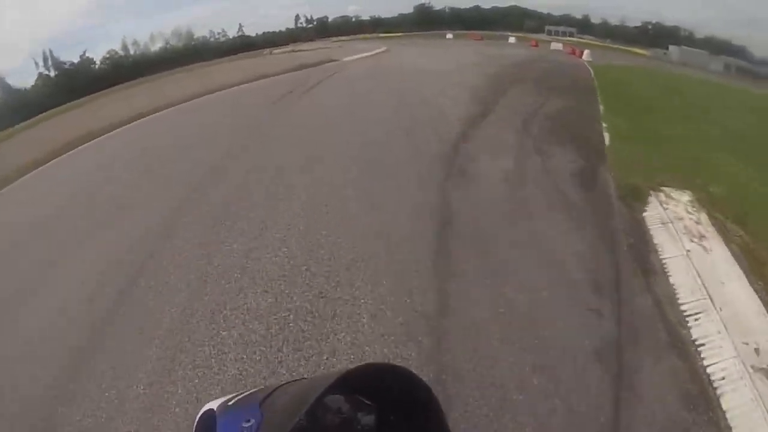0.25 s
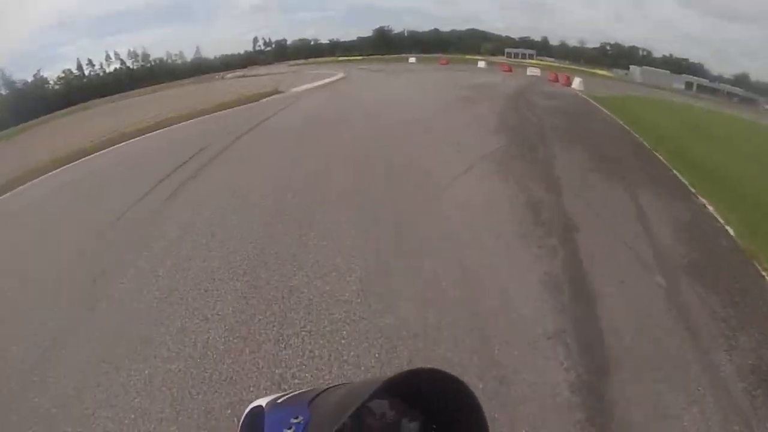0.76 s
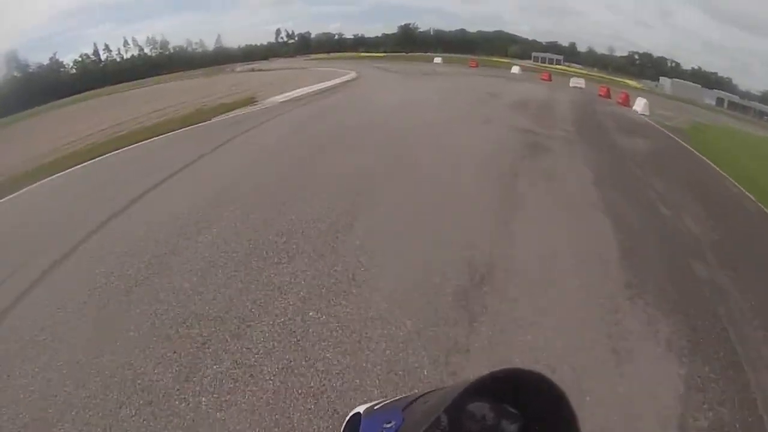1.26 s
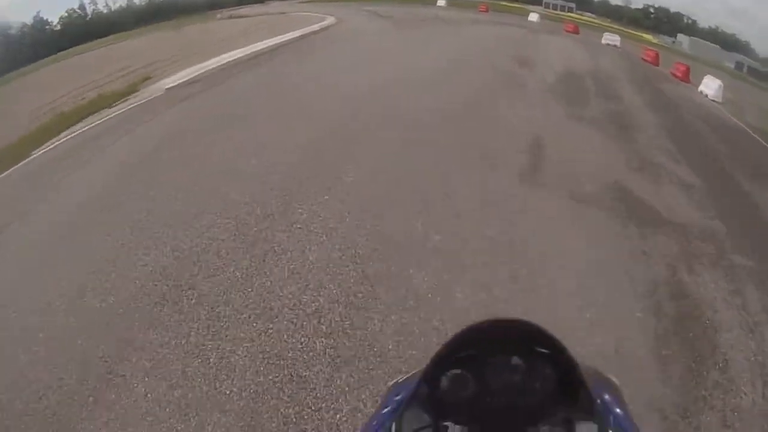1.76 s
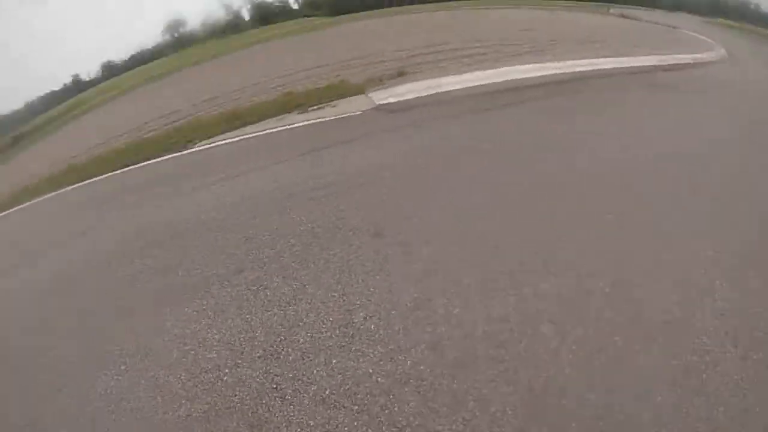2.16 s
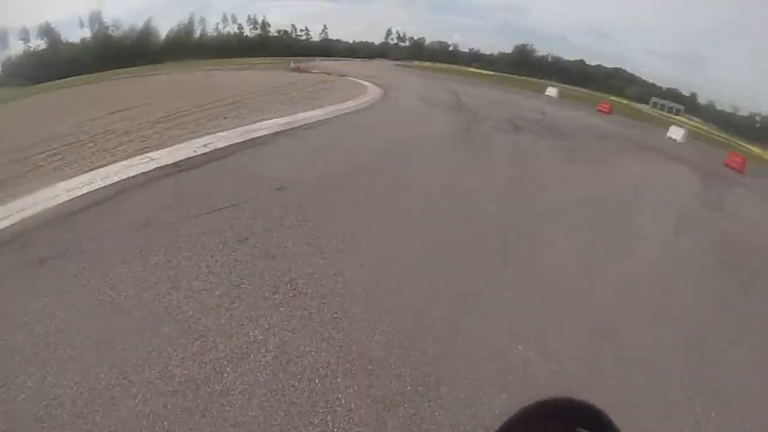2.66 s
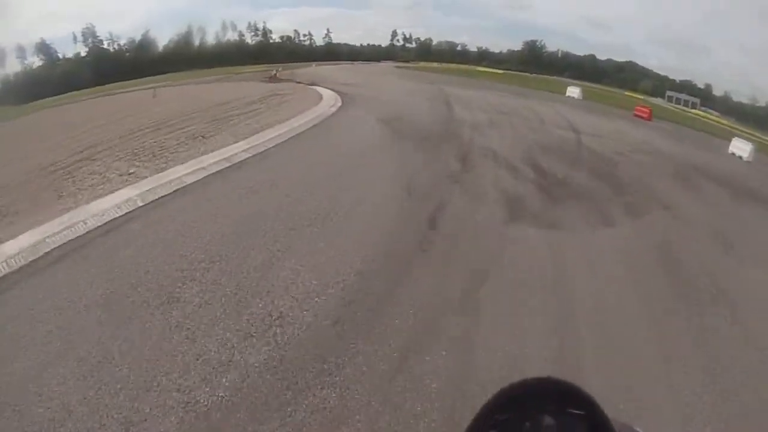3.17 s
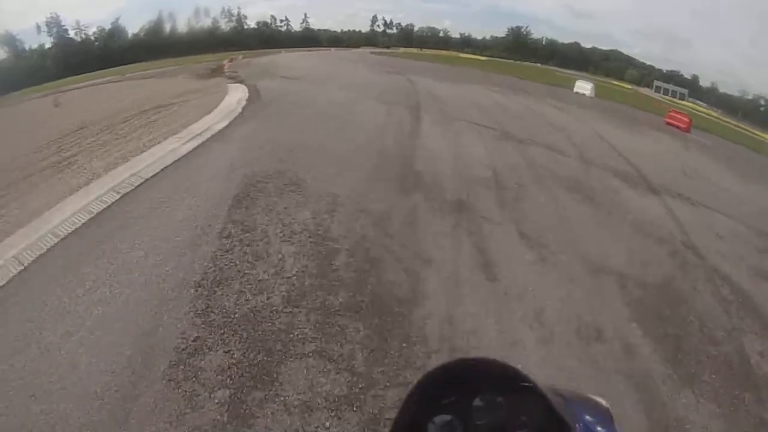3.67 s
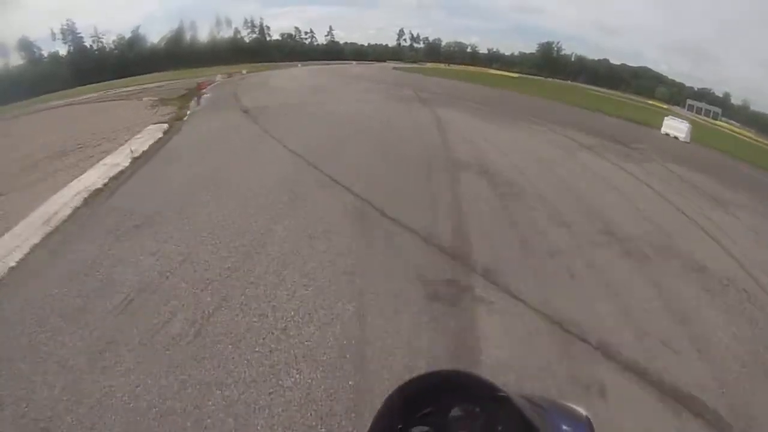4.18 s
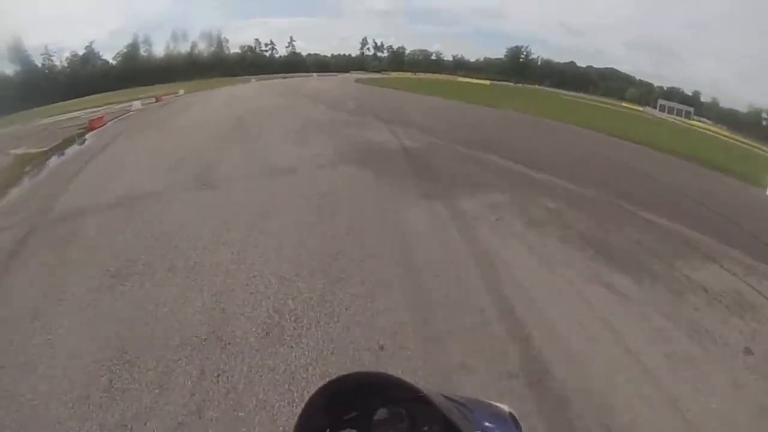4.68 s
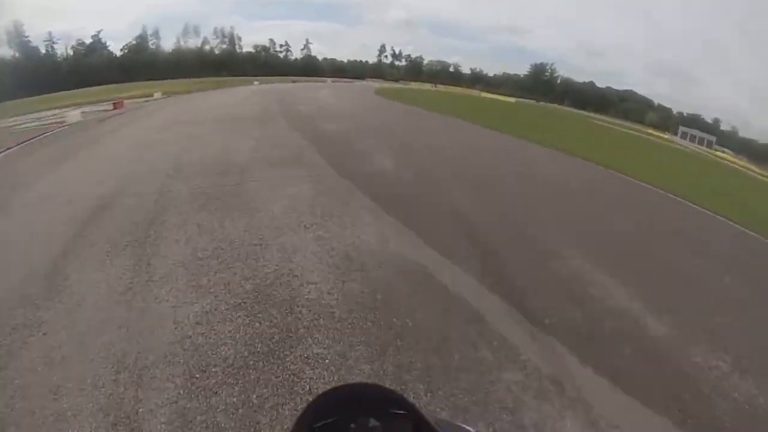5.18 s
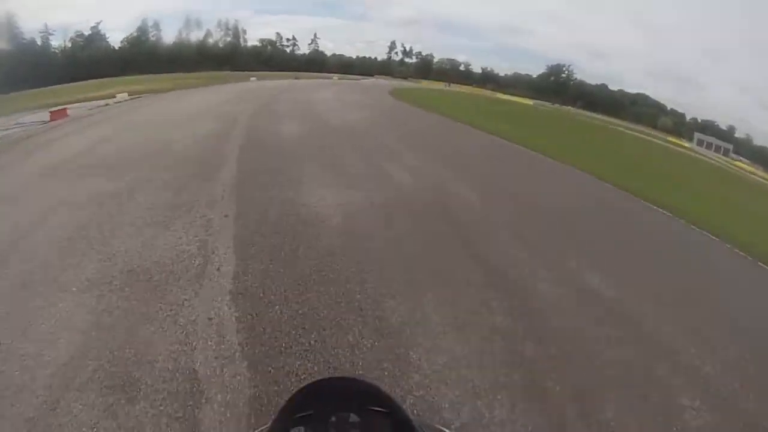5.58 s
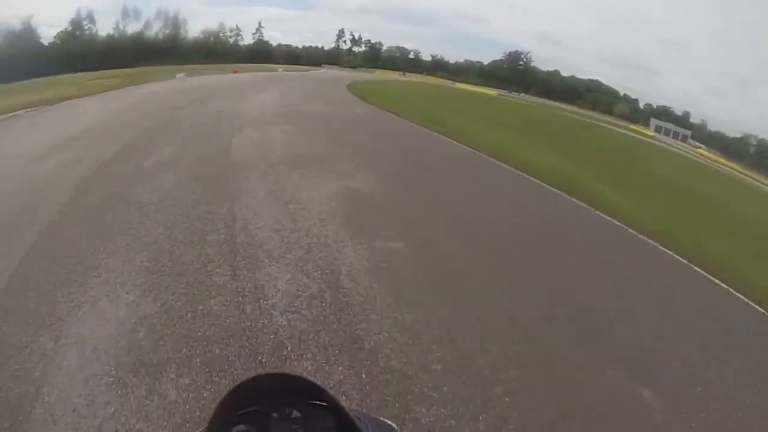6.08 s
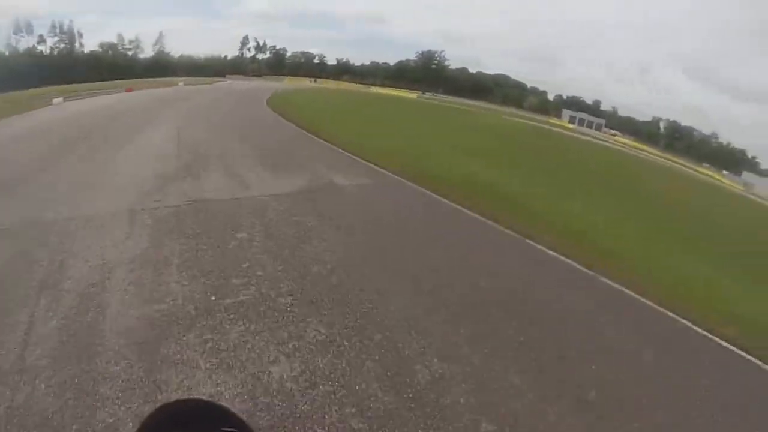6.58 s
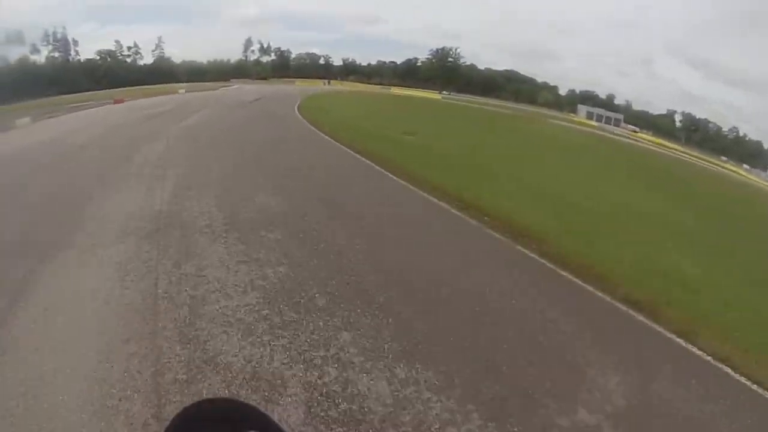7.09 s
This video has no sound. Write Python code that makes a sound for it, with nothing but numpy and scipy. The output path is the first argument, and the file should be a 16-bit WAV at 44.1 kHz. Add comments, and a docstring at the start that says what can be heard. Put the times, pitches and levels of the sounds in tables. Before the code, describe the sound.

Heavy wind noise fills a rider's microphone as a sport motorcycle takes the bends of a track. Deep, uneven buffeting runs beneath a continuous rush, which sags early, swells past the middle and then settles a little. The engine stays a faint, wavering drone, slightly clearer in the second half. Air whistles briefly, softly in the bend and higher just before the end.

```python
"""Wind thumps and rushes over a camera on a rider, as a sport motorcycle leans through race track bends.
Swirls of air shed by the rider's body (the wake) buffet the camera. Large swirls rumble, flap and roar;
small ones rush, hiss and fizz over its housing, which rings at a few hollow pitches.
The engine drones faintly under the wind, and three times air crossing an edge whistles briefly."""
import sys
import numpy as np
from scipy import signal
from scipy.fft import rfft, irfft, next_fast_len
from scipy.io import wavfile
from scipy.ndimage import uniform_filter1d, map_coordinates

SR = 44100
rng = np.random.default_rng(int(sys.argv[2]) if len(sys.argv) > 2 else 0)


def inscribe(sig):
    """Save sig as 16-bit PCM at rate SR to the path in sys.argv[1].

    A 1-D sig is mono; a 2-D sig holds one channel per row.
    Samples are clipped to [-1, 1] before scaling.
    """
    pcm = np.round(np.clip(np.atleast_2d(sig).T, -1, 1) * 32767)
    wavfile.write(sys.argv[1], SR, pcm.astype(np.int16))


N = 323694


def amp(db):
    """Turn decibels into a number to multiply a sound by."""
    return 10 ** (np.asarray(db) / 20)


def unit(x):
    """Scale x to an average strength (rms) of 1."""
    return x / np.sqrt(np.mean(x ** 2) + 1e-20)


def steady(x, seconds):
    """Even out the strength of x over the given time, then scale it to 1."""
    power = np.abs(uniform_filter1d(x ** 2, size=max(int(seconds * SR), 200)))
    return unit(x / np.sqrt(uniform_filter1d(power, size=400) + 1e-6))


def over_time(points):
    """Join (time_s, value) points with straight lines, one value per sample."""
    times_s, values = np.transpose(points)
    return np.interp(np.arange(N) / SR, times_s, values)


def over_pitch(points, hz):
    """Read (pitch_hz, level_db) points at hz, with the octaves evenly spaced."""
    pitch_hz, level_db = np.transpose(points)
    return np.interp(np.log(hz + 1), np.log(pitch_hz + 1), level_db)


def wobble(rate_hz):
    """A smooth curve through rate_hz random values a second."""
    values = rng.standard_normal(int(N * rate_hz / SR) + 4)
    return map_coordinates(values, [np.arange(N) * rate_hz / SR])


def filtered(x, gain_at):
    """Turn each frequency in x up or down by gain_at(hz)."""
    size = next_fast_len(N + SR // 2)
    return irfft(rfft(x, size) * gain_at(np.fft.rfftfreq(size, 1 / SR)), size)[:N]


# Where the hollow camera housing rings: pitch_hz, width_hz, lift_db
HOUSING_RINGS = [(281.5, 50, 5.5), (794, 107, 4.5), (1120, 69, 2), (1240, 60, -1), (1407, 214, 5.5),
                 (2094, 220, 2.5), (2800, 200, 2), (3683, 170, 5.5), (3906, 165, 4.5), (4980, 340, 4),
                 (5630, 180, 1.5), (6860, 300, 3.5), (7620, 290, 5)]
def housing_db(hz):
    """How much the ringing housing lifts each frequency."""
    return sum(db * 2 ** -((2 * (hz - centre) / width) ** 2) for centre, width, db in HOUSING_RINGS)


def wind_noise(tone, patchy_db):
    """Air noise of strength 1, shaped by tone and the housing; passing swirls lift patches of it."""
    grid = signal.stft(rng.standard_normal(N), nperseg=512)[2]
    patches = uniform_filter1d(rng.standard_normal(grid.shape), size=6, axis=0)  # blur across pitch
    patches = uniform_filter1d(patches, size=14, axis=1)  # blur across time
    noise = signal.istft(grid * amp(patchy_db * unit(patches)), nperseg=512)[1][:N]
    return unit(filtered(noise, lambda hz: amp(over_pitch(tone, hz) + housing_db(hz))))


# Strength of the wake, the churning air behind the rider's body: time_s, lift_db
WAKE_STRENGTH = [(0.0, -5), (2.05, -4.5), (2.5, 7.5), (2.6, -5), (2.8, -8.5), (2.95, 2), (3.1, -4),
                 (3.95, 1.5), (4.05, 0), (4.2, 2.5), (4.4, 2), (4.85, 4.0), (5.2, 0.1), (5.9, 1), (6.0, 0),
                 (6.9, 6), (7.05, 0.5), (7.34, -4.5)]
# The strongest swirls in the wake: peak_s, lift_db
WAKE_THUMPS = [(.63, 6), (1.03, 7), (1.28, 4), (1.47, 4), (1.76, 10), (1.96, 7), (2.11, 7), (2.28, 6.5),
               (2.46, 1.5), (3.0, 5.5), (3.239, 7), (3.49, 4), (3.72, 5.5), (3.85, 3), (4.19, 9.5),
               (4.3, 3.5), (4.57, 3), (4.81, 5.5), (5.48, 6), (5.82, 5), (5.94, 4), (6.3, 4), (6.67, 7)]
# Balance of low and high in the buffeting: pitch_hz, relative_db
BUFFET_TONE = [(25, -22), (45, -16), (58, -3.5), (74, 4.5), (90, -2), (106, -14.5), (150, -30.5),
               (250, -37), (500, -68), (1000, -90)]
def buffeting(base_db=-26, throb_db=1.5, thump_half_s=0.023):
    """Swirls shed by the rider's body thump the camera: a random throb, and a few that stand out."""
    t = np.arange(N) / SR
    thump_db = sum(db * np.exp(-((t - peak_s) / thump_half_s) ** 2) for peak_s, db in WAKE_THUMPS)
    level_db = base_db + over_time(WAKE_STRENGTH) + thump_db + throb_db * wobble(rate_hz=14)
    return amp(level_db) * steady(wind_noise(BUFFET_TONE, patchy_db=0.6), seconds=0.09)


# Airstream over the camera, dipping sharply around 2.4 s and peaking near 5 s: time_s, lift_db
AIR_STRENGTH = [(0.0, -4), (0.55, -4.4), (1.05, -3.0), (1.2, -3.5), (1.6, -0.7), (2.15, -2.5), (2.3, -6.5),
                (2.5, -6.5), (2.6, -4.5), (3.3, -1.6), (3.65, 0.5), (4.0, -0.2), (4.25, 3), (5.15, 5.5),
                (5.7, 3.0), (6.9, 0.3), (7.1, -1.5), (7.34, -0.5)]
# Extra rise and fall of the flapping: time_s, lift_db
FLAPPING_SWELL = [(0, 0.5), (.75, 1), (1.25, -3.5), (1.55, 1.5), (1.85, -0.5), (2.15, 3), (3.5, 0),
                  (3.95, -1.5), (4.5, 1), (6.15, 2.5), (6.55, -2), (7.34, 2)]
# Balance of low and high in the rumble, flapping and roar: pitch_hz, relative_db
RUMBLE_TONE = [(4, -2), (12, -9), (22, 6), (36, -8), (48, 7.5), (62, -9), (100, -20), (300, -90)]
FLAPPING_TONE = [(60, -27), (105, 0.5), (135, 2), (165, -3), (205, -4), (240, -7), (290, -11), (400, -24),
                 (900, -58), (2000, -90)]
ROAR_TONE = [(100, 1.5), (200, -5), (270, 1), (330, 3), (450, -1), (680, -1.5), (900, -7), (1300, -9.5),
             (3000, -50), (6000, -80)]
def gusts(rumble_base_db=-31, flapping_base_db=-33.5, roar_base_db=-37):
    """Large swirls: the rumble mostly follows the wake, the roar mostly the airstream, flapping both."""
    air_db = over_time(AIR_STRENGTH)
    wake_db = over_time(WAKE_STRENGTH)
    rumble_db = rumble_base_db + 0.1 * air_db + 0.6 * wake_db + 1.7 * wobble(rate_hz=11)
    rumble = amp(rumble_db) * steady(wind_noise(RUMBLE_TONE, patchy_db=1.5), seconds=0.14)
    flapping_db = flapping_base_db + 0.28 * air_db + 0.35 * wake_db + over_time(FLAPPING_SWELL)
    flapping = amp(flapping_db) * steady(wind_noise(FLAPPING_TONE, patchy_db=0.5), seconds=0.21)
    roar_db = roar_base_db + 0.79 * air_db + 0.19 * wake_db + 0.28 * wobble(rate_hz=16)
    roar = amp(roar_db) * wind_noise(ROAR_TONE, patchy_db=0.5)
    return rumble + flapping + roar


# Extra rise and fall of the hiss and of the higher fizz: time_s, lift_db
HISS_SWELL = [(0.0, -2.3), (1.6, 0.1), (1.9, -3.5), (2.3, 0), (2.48, 1), (2.56, 3), (3.45, -0.6),
              (5.0, 1.2), (6.0, 1), (6.25, -2.0), (6.9, .5), (7.34, -1.5)]
FIZZ_SWELL = [(0.0, -1), (1.65, .3), (2.1, -6), (2.35, 3.3), (2.6, -3), (3.25, -1.5), (3.35, 1), (5.5, 0.2),
              (6.55, 3.5), (6.75, 0.5), (7.34, 3)]
# Balance of low and high in the rush, hiss and fizz: pitch_hz, relative_db
RUSH_TONE = [(500, -58), (880, -15.5), (1020, -5), (1130, -1.5), (1450, -0.5), (1730, -0.5), (2380, -1),
             (2680, -10.5), (3050, -11), (3400, -14.5), (4200, -21), (5500, -46), (9000, -70)]
HISS_TONE = [(2000, -29), (3600, -3), (4500, -2), (5600, 0.5), (6300, -4), (7200, -10.5), (7800, -13.5),
             (8600, -22.5), (12000, -50), (15000, -80)]
FIZZ_TONE = [(5000, -40), (7500, 2), (8400, -1), (9500, 0.5), (10500, -4.5), (11800, -5.5), (12800, -15),
             (13700, -15), (15000, -26)]
def rushing_air(rush_base_db=-28, hiss_base_db=-43, fizz_base_db=-58.5):
    """Small swirls on the housing rush, hiss and fizz; a stronger airstream is louder and brighter."""
    air_db = over_time(AIR_STRENGTH)
    flutter = wobble(rate_hz=21.75)  # all three flutter together
    rush_db = rush_base_db + air_db + 0.24 * flutter
    hiss_db = hiss_base_db + 1.08 * air_db + over_time(HISS_SWELL) + 0.38 * flutter
    fizz_db = fizz_base_db + 1.18 * air_db + over_time(FIZZ_SWELL) + 0.55 * flutter
    rush = amp(rush_db) * wind_noise(RUSH_TONE, patchy_db=0.5)
    hiss = amp(hiss_db) * wind_noise(HISS_TONE, patchy_db=0.5)
    fizz = amp(fizz_db) * wind_noise(FIZZ_TONE, patchy_db=1.3)
    return rush + hiss + fizz


# Engine speed, as how often it fires: time_s, firing_hz
ENGINE_SPEED = [(0, 251.5), (1.0, 257.4), (1.65, 282.8), (1.95, 257.6), (2.6, 265), (3.2, 263.5),
                (3.7, 279.4), (4.5, 294.7), (5.4, 284), (6.05, 290.3), (6.4, 269), (7.0, 265.7),
                (7.34, 300)]
# How hard the engine works, heard as loudness: time_s, level_db
ENGINE_EFFORT = [(0, -48), (1.2, -59), (1.7, -37.5), (2.3, -50), (2.75, -39.5), (3.3, -47), (4.5, -41),
                 (5.1, -43), (5.45, -32), (5.8, -47), (6.05, -35), (6.7, -36.5), (7.34, -39)]
# The tones that make up the exhaust note: times_firing_rate, relative_db
EXHAUST_TONES = [(.5, 2), (1, 3.5), (1.5, -9.5), (2, -27), (3, -20), (4, -5.5), (5, -1)]
def engine(speed_waver=0.00796, shake_db=2.0):
    """The exhaust's tones follow the engine speed; the airstream shakes each one's strength."""
    firing_hz = over_time(ENGINE_SPEED) * (1 + speed_waver * wobble(rate_hz=18))
    phase = 2 * np.pi * np.cumsum(firing_hz) / SR
    note = sum(amp(db + shake_db * wobble(rate_hz=22)) * np.sin(multiple * phase)
               for multiple, db in EXHAUST_TONES)
    return amp(over_time(ENGINE_EFFORT)) * unit(note)


# Three brief whistles: peak_s, pitch_hz, level_db, glide_hz_per_s, fade_db_per_s
AIR_WHISTLES = [(2.39, 785, -50, 1100, 100), (2.555, 1065, -37.5, -3000, 190), (6.81, 3915, -31, -0.5, 93)]
def whistle(peak_s, pitch_hz, level_db, glide_hz_per_s, fade_db_per_s, crest_half_s=0.07):
    """Air across an edge makes a fuzzy tone that swells and fades, purest when it is strongest."""
    from_peak_s = np.arange(N) / SR - peak_s
    crest = np.exp(-(from_peak_s / crest_half_s) ** 2)
    sag = 0.045 * (1 - crest)  # share of the pitch lost away from the peak
    hz = np.clip(pitch_hz * (1 - sag) + glide_hz_per_s * from_peak_s, pitch_hz / 2, pitch_hz * 2)
    phase = 2 * np.pi * np.cumsum(hz) / SR
    held_cycles = 6 + 7 * crest  # the tone holds for only this many cycles, so it sounds fuzzy
    fuzz_position = np.cumsum(hz / held_cycles) / SR
    fuzz = lambda: map_coordinates(rng.standard_normal(N), [fuzz_position])
    tone = fuzz() * np.cos(phase) + fuzz() * np.sin(phase)
    return amp(level_db - fade_db_per_s * np.abs(from_peak_s)) * steady(tone, seconds=0.051)


def scene():
    """Wind in front, the engine beneath it and brief whistles, in one channel."""
    wind = buffeting() + gusts() + rushing_air()
    return (wind + engine() + sum(whistle(*row) for row in AIR_WHISTLES))[None]


def record(dry):
    """The camera keeps nothing above its highest frequency."""
    highest_hz = 15150
    return filtered(dry[0], lambda hz: hz < highest_hz)[None]


dry = scene()
out = record(dry)
inscribe(out)
```